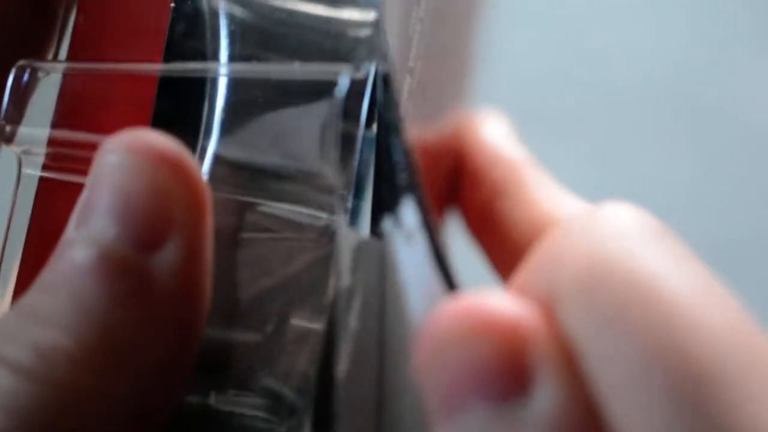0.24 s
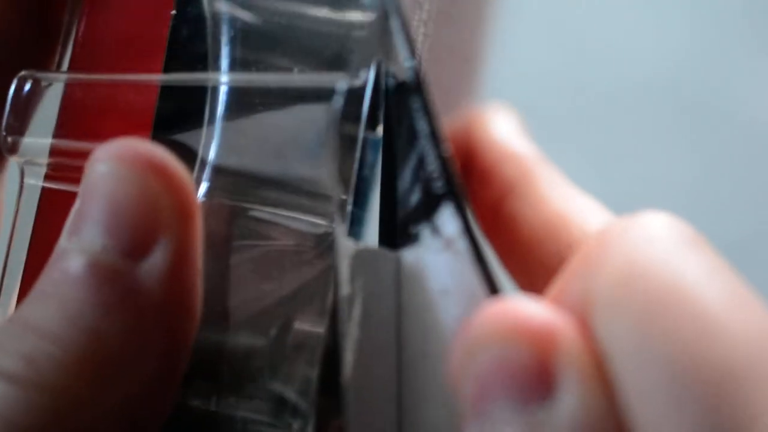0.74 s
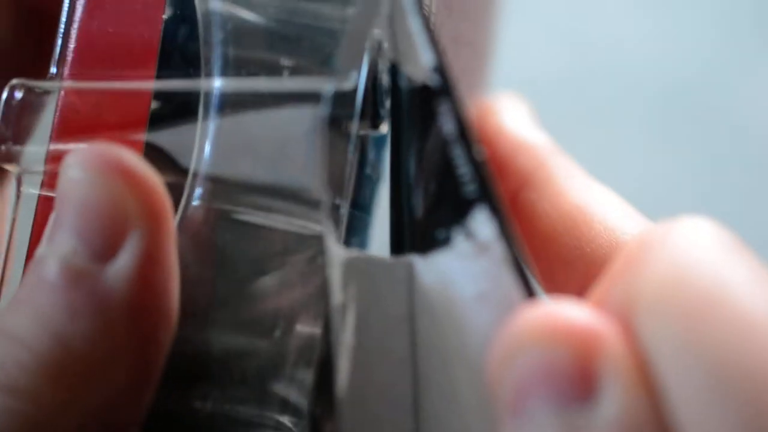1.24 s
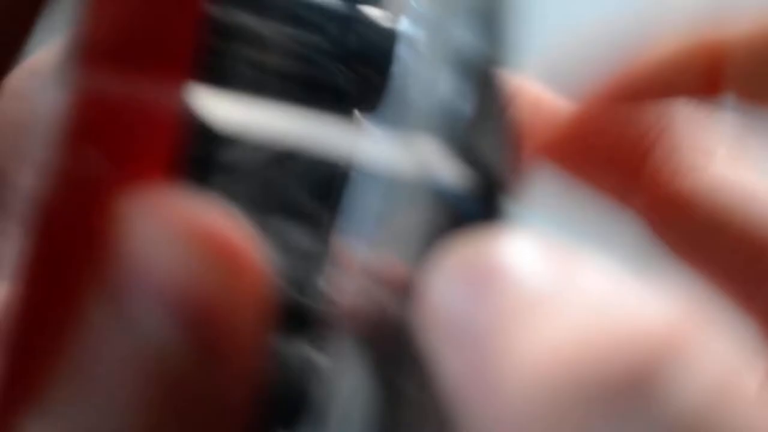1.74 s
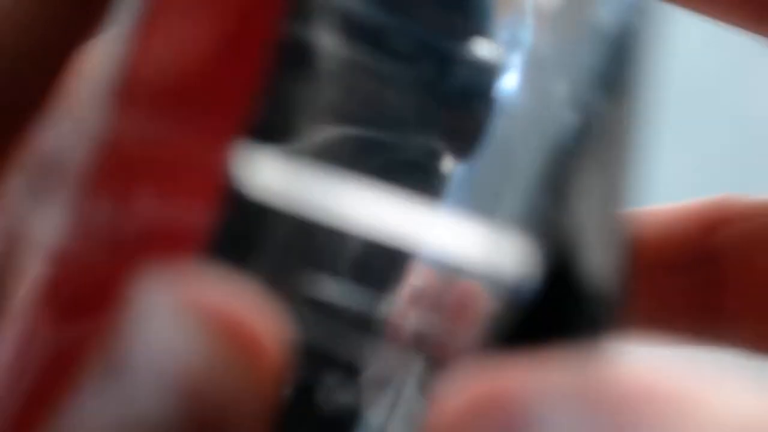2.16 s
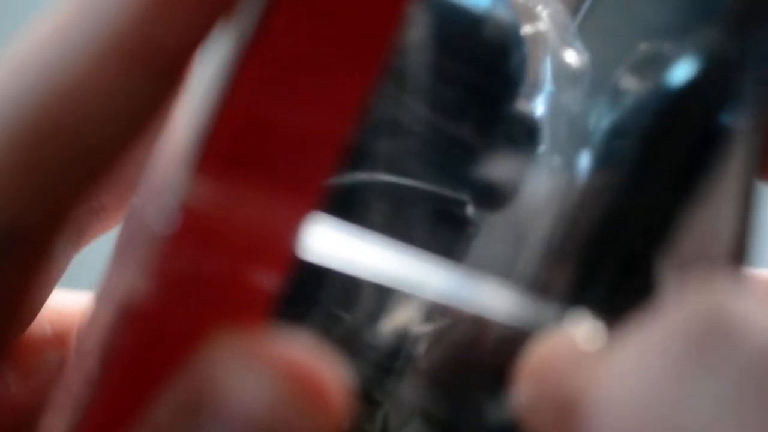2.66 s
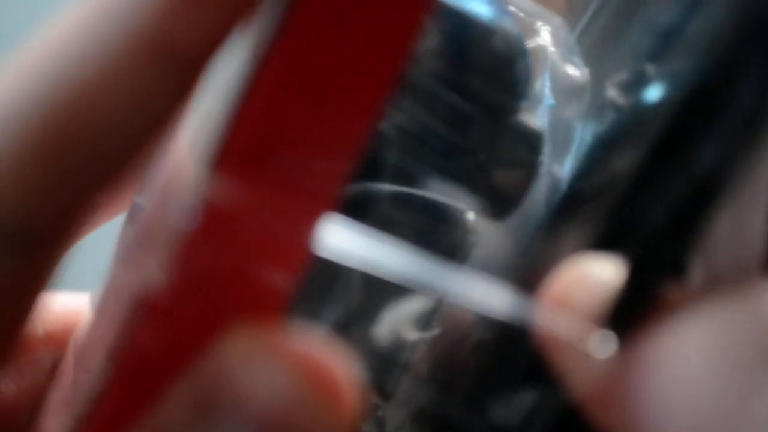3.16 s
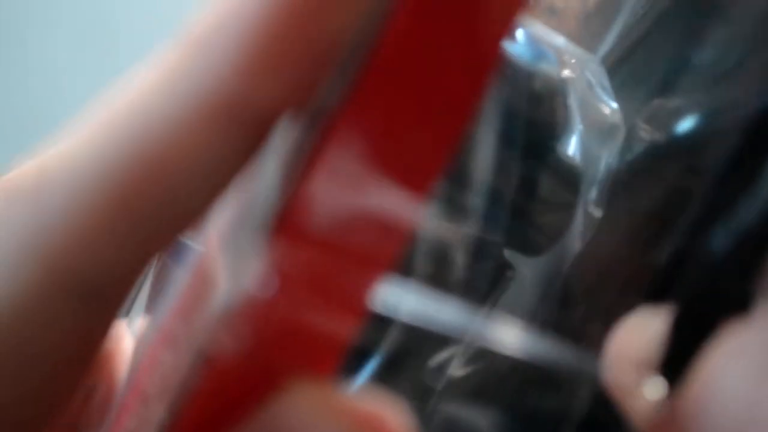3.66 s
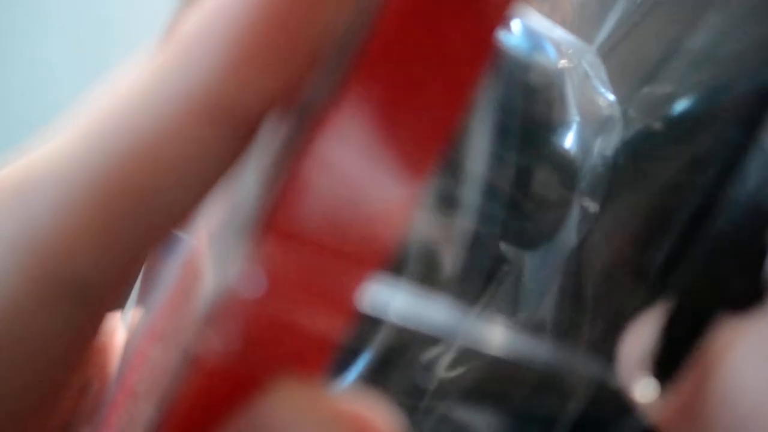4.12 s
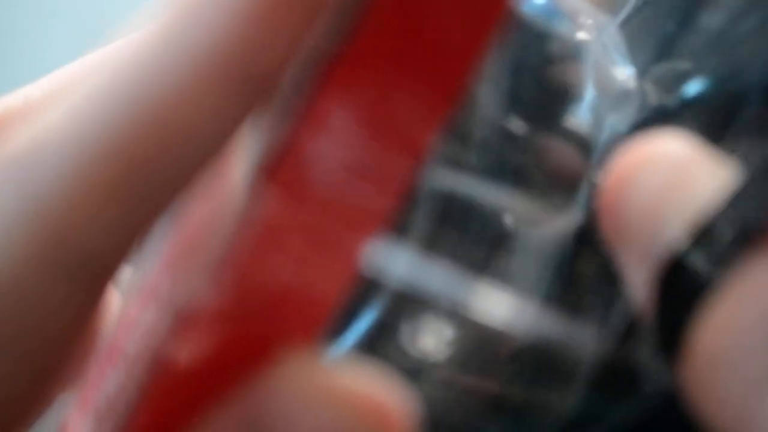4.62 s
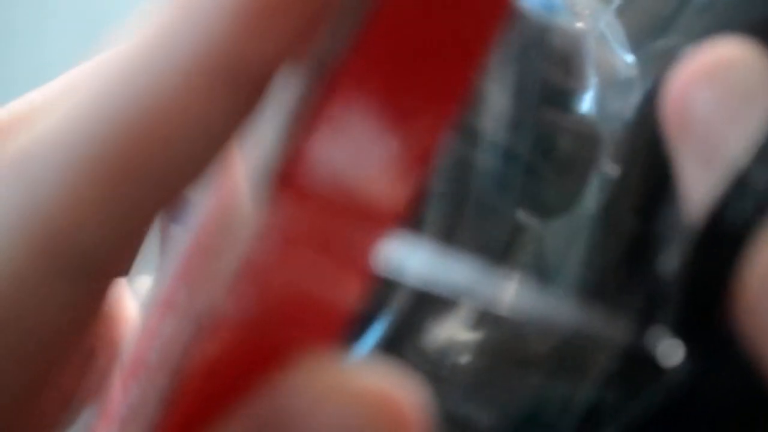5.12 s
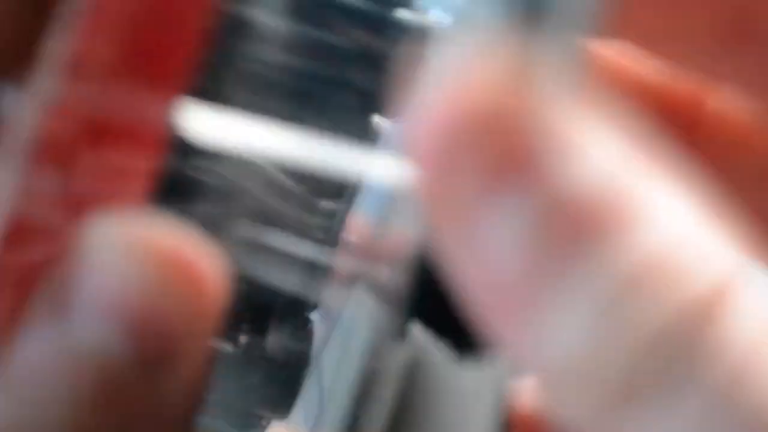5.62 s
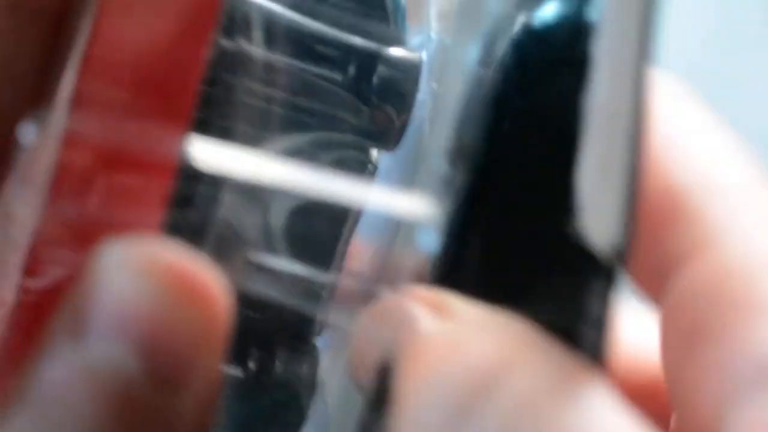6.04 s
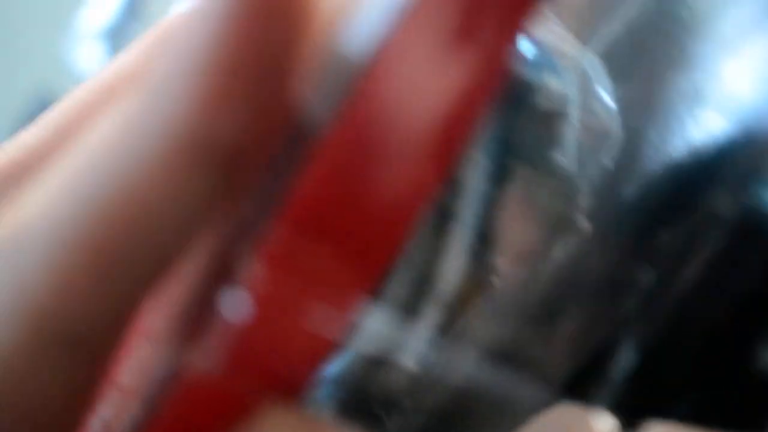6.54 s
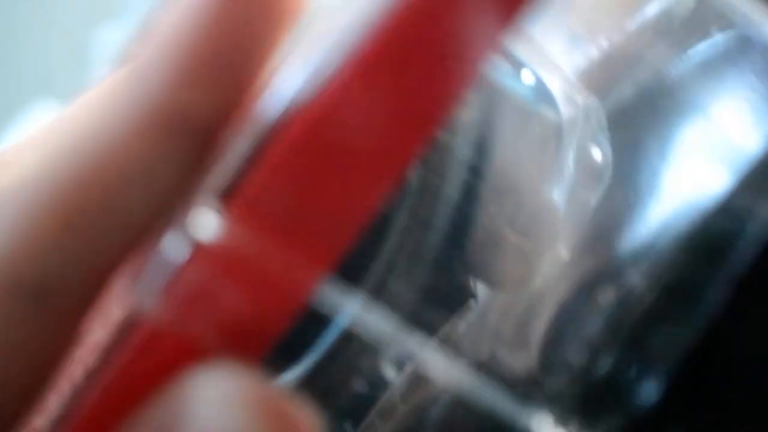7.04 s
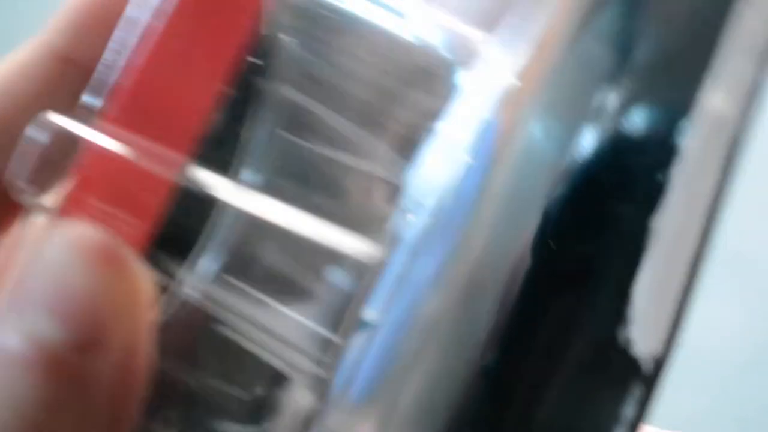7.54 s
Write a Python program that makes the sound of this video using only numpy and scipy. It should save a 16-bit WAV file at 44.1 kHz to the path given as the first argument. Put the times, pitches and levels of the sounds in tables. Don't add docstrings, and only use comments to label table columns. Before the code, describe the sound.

Stiff clear plastic is bent and peeled by hand. An early snap gives way to delicate dry crackle, then a hollow creasing pop, quiet irregular clicks, and a lull. Harsh cracks break out just after five seconds and again at seven, with smaller dents popping between them. Close, dry microphone, faint hiss, very short room tail.

```python
import sys
import numpy as np
from scipy import signal
from scipy.io import wavfile
from scipy.ndimage import uniform_filter1d

SR = 44100
rng = np.random.default_rng(int(sys.argv[2]) if len(sys.argv) > 2 else 0)


def pcm_store(signal):
    levels = np.round(np.clip(np.atleast_2d(signal), -1, 1) * 32767)
    wavfile.write(sys.argv[1], SR, levels.astype(np.int16).T)


def field_ratio(decibels):
    return 10 ** (np.asarray(decibels, dtype=float) / 20)


N = 343098


def evened(x):
    return x / np.sqrt(np.mean(x ** 2) + 1e-20)


def read(points, hz):
    f, value = np.transpose(points)
    return np.interp(np.log(hz + 1), np.log(f + 1), value)


def curve(rows, column):
    rows = np.array(rows)
    return np.interp(np.arange(N) / SR, rows[:, 0], rows[:, column])


def add(mix, s, sound):
    part = mix[max(round(s * SR), 0):][:len(sound)]
    part += sound[:len(part)]


def colour(x, points):
    log_gain = read(points, abs(np.fft.fftfreq(8192, 1 / SR))) * np.log(10) / 20
    taps = np.fft.ifft(np.exp(np.conj(signal.hilbert(log_gain)))).real[:2048]
    return signal.oaconvolve(x, taps)[:len(x)]


def passband(lo_hz, hi_hz):
    return signal.butter(3, [lo_hz, hi_hz], "band", fs=SR, output="sos")


def band(x, lo_hz, hi_hz):
    return signal.sosfilt(passband(lo_hz, hi_hz), x)


def ring(x, hz, width_hz):
    r = np.exp(-np.pi * width_hz / SR)
    turn = 2 * np.pi * hz / SR
    gain = (1 - r) * 2 * np.sin(turn)
    return gain * signal.lfilter([1], [1, -2 * r * np.cos(turn), r * r], x)


def bursts(rows, column, sag_db):
    out = np.zeros(N)
    for row in rows:
        size = round(row[1] * SR)
        sag = field_ratio(row[column] + sag_db * np.arange(size) / size)
        add(out, row[0], sag * signal.windows.tukey(size, .25))
    return out


# pitch in Hz, width in Hz, level in dB.
HOLLOWS = [(930, 1300, -11.5), (1563, 626, 12), (2330, 140, 1), (330, 810, -26)]


def hollow(x):
    out = 0
    for hz, width_hz, db in HOLLOWS:
        once = ring(x, hz, 1.73 * width_hz)
        out = out + field_ratio(db) * ring(once, hz, 1.73 * width_hz)
    return out


# centre in seconds, half width in seconds, change in dB.
GRIP = [(.14, 0.022, -13.5), (1.529, 0.038, -14.5), (2.002, 0.063, 8), (2.532, 0.035, -16),
        (3.061, 0.022, 8), (3.161, 0.093, -3), (3.74, 0.13, 3.5), (3.871, 0.042, -10), (4.23, 0.085, -5.5),
        (4.611, 0.011, 11.5), (5.15, 0.034, 6.5), (5.461, 0.28, -7.5), (5.85, 0.042, -13),
        (6.13, 0.041, 5.5), (6.231, 0.02, -6.5), (6.31, 0.021, 8.5), (6.95, 0.078, 12), (7.2, 0.096, -3),
        (7.361, 0.017, -16), (7.479, 0.058, 1), (7.601, 0.066, -12.5)]


def grip_db():
    t = np.arange(0, N, 64) / SR
    swell = sum(db * np.exp(-.5 * ((t - s) / half_s) ** 2) for s, half_s, db in GRIP)
    return np.interp(np.arange(N) / SR, t, swell)


def grains(per_s, spread_db):
    clump = field_ratio(3.5 * evened(uniform_filter1d(rng.standard_normal(N), 500)))
    size = field_ratio(spread_db * np.minimum(rng.exponential(1, N), 4)) * rng.standard_normal(N)
    return evened(size * (rng.random(N) < per_s * clump / SR))


# frequency in Hz, level in dB.
FILM_COLOUR = [(300, -40), (1500, 2), (2500, -3), (3500, 0.5), (5500, -0.5), (7000, 0.5), (9000, -1),
               (12000, -2)]
# time in seconds, effort in dB, film level over shell level in dB.
STRAIN = [(0, -74, 12.5), (.45, -70, 15), (.9, -64, 8.5), (1.3, -64, 16.5), (1.5, -58, 5.5),
          (2.0, -57.5, -22.5), (2.4, -59, -3), (2.9, -67, -0.5), (3.4, -66, 7), (3.75, -70.5, 12),
          (4.3, -52, -5.5), (4.6, -74, -8), (5.05, -66.5, 9.5), (5.6, -54.5, -18.5), (6.1, -56, -7),
          (6.7, -58.5, -1), (7.1, -57.5, -9), (7.78, -55, 0.5)]


def crackle():
    ticks = grains(per_s=3000, spread_db=3.2)
    patch = rng.integers(0, 5, N)
    strain, film = [], 0
    for k, hz in enumerate([2638, 3700, 5300, 7340, 10100]):
        here = patch == k
        strain.append(field_ratio(4.5 * evened(uniform_filter1d(here - np.mean(here), 6000))))
        film = film + ring(ticks * here * strain[k], hz, 2400)
    film = evened(colour(evened(film) + .35 * ticks, FILM_COLOUR))
    taps = 0.55 * ticks + .8 * grains(per_s=1200, spread_db=3)
    dull = evened(hollow(taps)) * np.sqrt(strain[1]) + 0.4 * evened(ring(taps * strain[3], 900, 350))
    effort_db, grip = curve(STRAIN, 1), grip_db()
    film_db = effort_db + curve(STRAIN, 2) + 1.6 * grip
    return field_ratio(film_db + 2) * film + field_ratio(effort_db + grip + 1) * dull


# time in seconds, share from 0 to 1.
SLIT_SHARE = [(0, 0.17), (1.4, 0.02), (1.6, 0.16), (2.4, 0), (2.7, 0.2), (3.3, 0.16), (3.9, 0.55),
              (4.2, 0.04), (4.5, 0.3), (6.4, 0.06), (6.9, 0.1), (7.78, 0.03)]
# pitch in Hz, width in Hz, level in dB.
SLIT_NOTES = [(1704, 460, 8.5), (3490, 420, 2.5), (5090, 300, 1), (7500, 1000, -2.5), (9940, 1500, 6),
              (950, 270, 6)]


def slit(x):
    share = np.clip(curve(SLIT_SHARE, 1), 0, 1)
    pipe = sum(field_ratio(db) * ring(x, hz, width_hz) for hz, width_hz, db in SLIT_NOTES)
    return (1 - share) * x + share * pipe


# frequency in Hz, time to fall 60 dB in seconds.
ROOM_RING = [(300, 0.37), (800, 0.19), (2000, 0.24), (5500, 0.21), (10000, 0.2)]


def room(x):
    out, turn = np.zeros(N), 2 * np.pi * 7 * np.arange(N) / SR
    for k in range(3):
        hz, t, z = signal.stft(rng.standard_normal(SR // 3), SR, nperseg=128)
        fall = field_ratio(-60 * t / read(ROOM_RING, hz)[:, None])
        tail = signal.istft(z * fall, SR, nperseg=128)[1]
        tail *= np.clip(np.arange(len(tail)) / SR / 0.0014, 0, 1)
        tail *= field_ratio(-16.5) / np.linalg.norm(tail)
        share = np.sqrt(2 / 3) * np.cos(turn + k * 2 * np.pi / 3)
        out += signal.oaconvolve(x * share, tail)[:N]
    return out


# ratio to its pitch, level in dB, time to fall 60 dB in seconds.
SHELL_NOTES = [(1, 4.5, 0.014), (1.55, -8.5, 0.016), (2.2, -10.5, 0.018)]


def crease(crack_db, hz, shell_db, edge_db, slip_s, chance):
    t = (np.arange(len(chance)) - 300) / SR
    creep = .5 * np.clip((crack_db + 20) / 12, .25, 1)
    slip = np.where(t < 0, creep * np.exp(t / slip_s), np.exp(-t / slip_s))
    jerks = slip * chance[:, 0] * field_ratio(6.7 * chance[:, 1])
    jerks = jerks + 1.2 * abs(jerks).max() * (t == 0)
    facet_hz = 7300 * np.exp(.2 * np.tanh(chance[1, 0]))
    edge = band(jerks + 2.5 * ring(jerks, facet_hz, 900), 5500, 16000)
    since = t - t[0]
    shell = 0
    for ratio, db, t60_s in SHELL_NOTES:
        shell = shell + field_ratio(db - 60 * since / t60_s) * np.sin(2 * np.pi * hz * ratio * since)
    push = slip ** 3 * (0.39 + chance[:, 2])
    shell = evened(signal.fftconvolve(shell, push)[:len(t)])
    body = shell + 0.62 * evened(hollow(jerks)) + 0.31 * evened(ring(jerks, 1100, 200))
    shell = band(body, 0.85 * min(hz, 1000), 3900)
    thud = band(slip ** 2 * (1 + chance[:, 2]), 180, 470)
    crack = band(jerks, 2000, 5100)
    parts = (crack, crack_db), (shell, shell_db), (edge, edge_db + 4.5), (thud, shell_db - 27.5)
    return sum(field_ratio(db) * part / abs(part).max() for part, db in parts)


def chances(rows):
    return zip(rows, rng.standard_normal((len(rows), 2000, 3)))


# time in seconds, level in dB.
SHELL_TICKS = [(0.022, -34.5), (1.5, -37.5), (1.888, -37), (1.935, -31), (2.137, -35), (2.227, -28.5),
               (3.333, -32.5), (3.388, -32.5), (3.602, -41), (3.788, -33), (4.011, -37), (4.174, -36.5),
               (4.212, -39), (4.265, -32), (4.281, -23), (4.348, -27), (4.406, -37), (5.256, -27.5),
               (5.503, -35), (5.627, -28.5), (5.679, -25), (5.886, -43.5), (5.929, -37.5), (6.137, -53),
               (6.374, -21), (6.47, -28), (6.587, -35), (7.167, -43), (7.399, -30.5), (7.473, -34)]
# time in seconds, level in dB.
RIM_TICKS = [(0.333, -50), (0.374, -37), (1.038, -51), (1.057, -34.5), (1.199, -34.5), (1.26, -38),
             (1.27, -29.5), (1.296, -23), (1.312, -25), (1.617, -32), (1.673, -38), (2.556, -40),
             (2.689, -35), (2.75, -33.5), (2.949, -35), (3.069, -33.5), (3.207, -43.5), (3.405, -44),
             (3.438, -35), (3.483, -39), (3.568, -35), (3.652, -25), (3.699, -30), (3.918, -24),
             (4.286, -29), (6.127, -30.5), (6.457, -55), (6.886, -26.5), (6.899, -34), (7.307, -32)]
# time in seconds, level in dB.
FILM_TICKS = [(0.3864, -55), (0.4833, -28), (0.5084, -34), (0.5931, -27), (0.6214, -29), (0.6439, -28.5),
              (0.6789, -31), (0.6963, -43), (0.7554, -31), (0.7754, -56), (0.8016, -25), (0.8425, -31),
              (0.9734, -35), (0.9926, -25.5), (1.1204, -36), (1.1508, -38), (1.3064, -24), (1.3997, -30.5),
              (2.6189, -43), (2.7257, -32), (3.0011, -33.5), (3.5558, -34.5), (3.7264, -32), (3.7768, -43),
              (4.8983, -34.5), (5.036, -36.5), (5.1307, -34), (5.5623, -19), (6.9755, -22.5),
              (7.2984, -21.5)]


def ticks():
    out = np.zeros(N)
    for rows, shell_db, crack_db, edge_db in ((SHELL_TICKS, -2.5, -7.5, -20.5),
                                              (RIM_TICKS, -7, -0.5, -3),
                                              (FILM_TICKS, -16.5, -4.5, -3)):
        for (s, db), chance in chances(rows):
            hz = HOLLOWS[int(chance[0, 0] > -.3)][0] * (1 + 0.12 * chance[0, 1])
            tick = crease(db + crack_db, hz, db + shell_db, db + edge_db, slip_s=.00037, chance=chance)
            add(out, s - .0072, tick)
    return out


# time in seconds, crack in dB, shell pitch in Hz,
# shell ring in dB, bright edge in dB.
SNAPS = [(0.066, -17.5, 794, -5, -18.5), (0.191, -4, 1350, -5, -2.5), (0.196, -14.5, 950, -16.5, -9.5),
         (1.568, -41, 1410, -19.5, -48), (1.786, -25.5, 1070, -35, -48), (2.061, -34, 775, -21, -53),
         (2.29, -7, 950, -4, -22.5), (3.28, -22, 1026, -13, -54), (3.616, -19, 1480, -16.5, -32),
         (3.911, -18, 1760, -21, -22.5), (3.997, -12, 1234, -8, -23), (4.276, -15, 2190, -55, -23),
         (5.179, -3, 807, -12.5, -9.5), (5.237, -41, 788, -14, -29), (5.567, -33, 990, -16.5, -52.5),
         (5.699, -16, 2430, -13.5, -39), (6.359, -6, 1353, -13, -14), (6.804, -22.5, 1470, -18.5, -31.5),
         (7.017, 0, 960, -1, -10), (7.152, -24.5, 1120, -8.5, -28.5), (7.227, -14.5, 1827, -11, -24),
         (7.287, -14, 930, -29.5, -19), (7.321, -21.5, 2510, -28.5, -16.5), (7.742, -17, 1870, -12, -19)]


def snaps():
    out = np.zeros(N)
    for (s, crack_db, hz, shell_db, edge_db), chance in chances(SNAPS):
        add(out, s - .0073, crease(crack_db, hz, shell_db, edge_db, slip_s=.0011, chance=chance))
    return out


# from Hz, to Hz, time to fall 60 dB in seconds, level in dB.
SETTLE = [(735, 1180, 0.15, -21), (1350, 2300, 0.15, -21), (2680, 3900, .14, -20.5),
          (5500, 13000, 0.2, -23)]


def settle(x):
    out = np.zeros(N)
    for lo_hz, hi_hz, t60_s, db in SETTLE:
        keep = 10 ** (-6 / (t60_s * SR))
        power = signal.lfilter([.002], [1, -keep], band(x, lo_hz, hi_hz) ** 2)
        out += field_ratio(db + 7) * np.sqrt(power) * evened(band(rng.standard_normal(N), lo_hz, hi_hz))
    return out


def slips(rows, width_hz, overtone_db):
    out, t = np.zeros(N), np.arange(900) / SR
    jolts = rng.standard_normal((len(rows), len(t))) * np.exp(-t / 0.00044)
    jolts = jolts + 3 * (t == 0)
    for (s, db, hz, click_db), jerks, click in zip(rows, jolts, band(jolts, 2200, 12000)):
        overtone = ring(jerks, min(hz * 3.05, 9800), 2 * width_hz)
        note = ring(jerks, hz, width_hz) + field_ratio(overtone_db) * overtone
        both = note / abs(note).max() + field_ratio(click_db) * click / abs(click).max()
        add(out, s - .0003, field_ratio(db - 7) * both)
    return out


# time in seconds, level in dB, note in Hz, click over note in dB.
THREADS = [(0.1785, -35, 2670, 1), (0.2476, -26, 5620, -4), (0.421, -42, 3460, -2), (0.4632, -30, 3380, 0),
           (0.4758, -37, 5880, 4), (0.4945, -35, 3320, -2), (0.6137, -41, 1540, -4),
           (0.6417, -29, 3080, -4), (0.7181, -40, 2890, -2), (0.7265, -34, 1720, 0),
           (0.7376, -31, 5160, -2), (0.8757, -34, 2840, 2), (0.8831, -34, 1670, -2), (0.9437, -27, 5250, 0),
           (0.9541, -30, 2270, -2), (1.0237, -33, 2590, -5), (1.0525, -32, 2560, -4),
           (1.0608, -31, 2500, -9), (1.0715, -34, 3010, -7), (1.101, -28, 2840, -4),
           (1.1433, -28, 2620, -5), (1.1681, -38, 2640, -4), (1.1771, -35, 2620, -4),
           (1.2212, -25, 1850, -4), (1.2479, -33, 1800, -2), (1.375, -36, 1850, -5),
           (1.4417, -36, 1650, -10), (1.4652, -38, 3360, -2), (1.4869, -32, 1810, 0),
           (1.8359, -40, 1510, -2), (2.2426, -35, 3760, -5), (4.2725, -19, 3500, -2),
           (4.2994, -24, 1510, -4), (4.3362, -42, 3210, -5), (4.4382, -43, 1570, -5),
           (5.1941, -10.5, 5140, 3), (5.9519, -32, 4900, 0), (6.0527, -38, 1750, 6),
           (6.1645, -28, 1560, -4), (6.2497, -50, 1820, -2), (6.26, -37, 1730, 1), (6.9554, -36, 9090, -2),
           (6.9667, -25, 1830, -2), (6.9884, -27, 7560, 1), (6.9985, -26.5, 1540, -5),
           (7.1729, -31, 1630, 2), (7.3865, -34, 8910, -1), (7.4553, -36, 1750, -2),
           (7.6942, -40, 1690, -0.5), (7.7253, -26, 9220, -2)]


def threads():
    return slips(THREADS, width_hz=500, overtone_db=-7.5)


# frequency in Hz, level in dB.
SEAM_COLOUR = [(1200, -36), (2300, 3.5), (3600, 4), (5500, -1), (8000, -6.5), (11000, -10)]
# start in seconds, length in seconds, film in dB, shell in dB.
TEARS = [(.916, 0.019, -43, -45.5), (1.295, 0.066, -47.5, -47.5), (1.612, 0.015, -44, -41),
         (4.265, 0.037, -39, -36), (5.167, 0.0099, -35, -40), (5.173, 0.035, -26, -27),
         (5.2, 0.033, -37, -32.5), (5.236, 0.018, -37, -33.5), (5.665, 0.047, -40, -38.5),
         (5.963, 0.021, -38, -33.5), (5.972, 0.026, -24.5, -32.5), (7.0, 0.021, -34, -34.5),
         (7.13, 0.056, -49.5, -43.5), (6.282, 0.14, -63, -56), (2.271, .018, -46, -48),
         (3.6, .016, -56, -50), (2.0, .055, -62, -58), (.188, .03, -34, -36)]


def tears():
    rough = field_ratio(2.5 * evened(uniform_filter1d(rng.standard_normal(N), 30)))
    crunch = rng.standard_normal(N) * rough
    film = bursts(TEARS, column=2, sag_db=-4.5) * evened(colour(crunch, SEAM_COLOUR))
    shell = bursts(TEARS, column=3, sag_db=-4.5) * evened(hollow(crunch))
    return film + shell


# time in seconds, shell ring in dB, shell pitch in Hz, bright edge in dB.
POPS = [(0.502, -35.5, 900, -23), (0.525, -28.5, 1760, -29.5), (0.558, -34.5, 1780, -27),
        (0.781, -32.5, 1770, -29), (0.923, -25, 1420, -27.5), (0.981, -25.5, 1900, -29),
        (1.256, -23, 1940, -38), (1.38, -22.5, 1490, -36), (1.548, -21.5, 1350, -35),
        (1.798, -15, 990, -33.5), (1.884, -22, 1370, -61), (2.288, -28, 920, -17),
        (2.421, -21.5, 1540, -50), (2.659, -30, 789, -28), (2.738, -29, 1550, -23.5),
        (3.241, -31, 1670, -40), (3.42, -32, 1570, -32), (5.244, -18, 1530, -22.5),
        (5.347, -22.5, 1470, -25.5), (5.587, -16, 1350, -43), (5.636, -19, 920, -32),
        (5.725, -9, 1390, -74), (5.755, -15, 1500, -25), (6.344, -18, 1380, -29), (6.498, -20, 1680, -41),
        (6.678, -17, 1630, -48), (6.767, -24.5, 1530, -31), (6.93, -33, 1810, -9), (7.424, -11, 955, -25.5),
        (7.512, -27.5, 1430, -26)]


def pops():
    out = np.zeros(N)
    for (s, db, hz, edge_db), chance in chances(POPS):
        shell_db, edge_db = db - 8, edge_db - 3.5
        crack_db = (shell_db + edge_db) / 2 + 2.5
        add(out, s - .0073, crease(crack_db, hz, shell_db, edge_db, slip_s=.002, chance=chance))
    return out


# time in seconds, level in dB, note in Hz, click over note in dB.
KNOCKS = [(1.655, -37, 795, -18), (1.6872, -34, 1010, -18), (1.712, -41, 620, -18), (1.7393, -37, 950, -18),
          (1.7718, -47, 930, -18), (1.8287, -29, 990, -18), (1.9601, -32, 860, -18),
          (1.9802, -43, 1640, -28), (2.0052, -36, 1430, -18), (2.0225, -31, 960, -18),
          (2.0373, -31, 1064, -21), (2.1718, -40, 1030, -18), (4.3182, -31, 1020, -17),
          (4.3596, -31, 935, -18), (4.4046, -34, 1010, -18), (4.4363, -40, 1660, -18),
          (4.4658, -42.5, 1590, -17), (5.8755, -42, 1390, -18), (5.8863, -37, 790, -18),
          (5.9296, -35.5, 920, -20), (6.139, -36, 1690, -18), (6.6639, -29, 795, -24),
          (7.3986, -29, 1560, -18)]


def knocks():
    return slips(KNOCKS, width_hz=240, overtone_db=-18)


# start in seconds, length in seconds, level in dB.
BUMPS = [(1.685, 0.054, -62), (1.795, 0.023, -49.5), (1.88, 0.014, -49), (4.27, 0.055, -71),
         (4.346, 0.016, -56.5), (4.359, 0.021, -57), (4.402, 0.017, -70), (4.434, 0.014, -63),
         (5.235, 0.017, -31), (5.255, 0.022, -44.5), (5.875, .02, -61.5), (5.925, 0.022, -63.5),
         (5.68, 0.068, -61), (6.13, 0.086, -67), (7.42, 0.023, -55), (2.058, 0.019, -52),
         (1.99, 0.11, -64.5), (5.567, 0.0083, -50.5), (5.724, 0.014, -43.5), (7.397, 0.023, -57.5)]


def rub():
    low = colour(rng.standard_normal(N), [(30, -69), (250, 13.5), (450, 10), (900, 3), (1800, -18)])
    return field_ratio(17) * evened(low) * bursts(BUMPS, column=2, sag_db=-15.5)


# time in seconds, level in dB, note in Hz, click over note in dB.
PINGS = [(2.6505, -47, 980, -3), (2.6958, -39, 1600, -4), (2.7035, -43, 860, -2), (2.7265, -28, 1510, -2),
         (2.7514, -25, 1480, -7), (2.8392, -44, 1460, -4), (2.864, -45, 1780, -4), (2.8819, -40, 850, -2),
         (2.9094, -34, 1570, -2), (2.9314, -43, 1720, -4), (2.9804, -34, 1610, -4), (3.0469, -47, 1640, -4),
         (3.0808, -33.5, 1780, -8), (3.1401, -47, 1100, -4), (3.1703, -49, 1710, -4),
         (3.2066, -34, 1740, -8), (3.2312, -40, 1740, -4), (3.2719, -37, 1750, -4), (3.3417, -47, 930, -4),
         (3.3806, -38, 850, -2), (3.4043, -31, 1730, -2), (3.4821, -34, 1670, -4), (3.517, -39, 1600, -4),
         (3.537, -38, 1630, -4), (3.6877, -36, 1490, -4), (3.7152, -32, 1410, 3), (3.7405, -39, 1310, -4),
         (3.754, -38, 1650, 1), (3.7965, -37, 2110, -1.5), (3.8508, -41, 1790, -4), (3.8895, -39, 1740, -4),
         (5.061, -33, 1570, -3), (5.1315, -36, 1520, 1.5), (5.2152, -23, 1480, -4), (6.0917, -36, 1650, -4),
         (6.2835, -36, 1460, -4), (6.4578, -30, 1440, -16), (6.4928, -32, 1880, -13),
         (6.5333, -39, 1710, -4), (6.6447, -42.5, 1800, -1), (6.7519, -33, 1730, -5.5),
         (6.846, -34, 1730, -4), (7.0665, -31, 1100, -5.5), (7.4283, -18, 920, -1.5)]


def pings():
    return slips(PINGS, width_hz=170, overtone_db=-7.5)


def scene():
    loud = snaps() + pops() + ticks()
    fine = crackle() + tears()
    single = threads() + pings() + knocks()
    close = slit(loud + fine) + single
    return (close + room(close) + slit(settle(loud + single)) + rub())[None]


def top_cut(x):
    return signal.sosfilt(signal.butter(12, 16620, fs=SR, output="sos"), x)


# frequency in Hz, level in dB.
MIC = [(30, -25), (300, -8), (700, 0), (1080, 0), (1240, -6), (1420, 0), (3700, 0), (4100, -5), (4800, 0),
       (7300, -2), (7900, -9), (8500, 0), (10500, -5), (11800, -24), (13200, -55)]
# frequency in Hz, level in dB per Hz.
HUSH = [(18, -43.5), (30, -8), (227, -3), (280, 2), (801, -1), (962, 1.5), (1220, -2.5), (6210, -13.5),
        (7870, -23.5), (8980, -16), (16000, -63.5)]


def record(dry):
    heard = colour(dry[0], MIC)
    clipped = np.clip(heard - 0.071 * heard ** 4, -.72, .72)
    clipped = signal.sosfilt(signal.butter(2, 13000, fs=SR, output="sos"), clipped)
    hush = field_ratio(-68) * evened(colour(rng.standard_normal(N), HUSH))
    return top_cut((clipped + hush)[None])


dry = scene()
out = record(dry)
pcm_store(out)
```